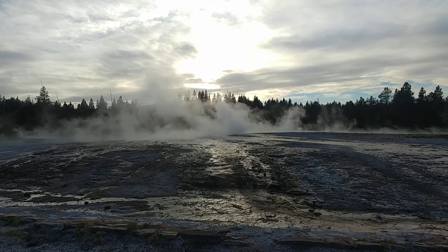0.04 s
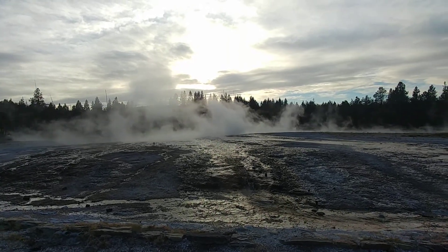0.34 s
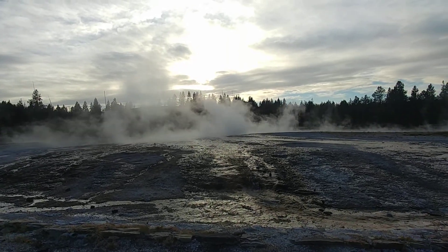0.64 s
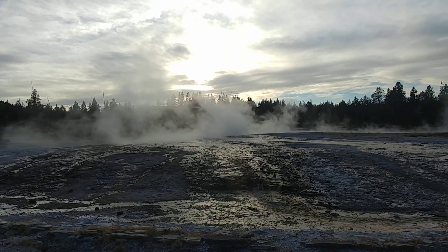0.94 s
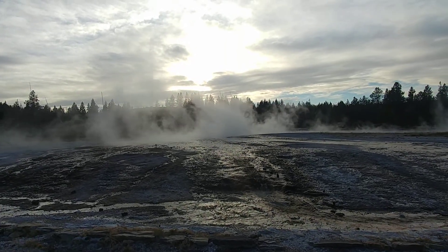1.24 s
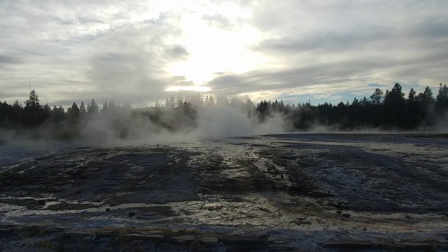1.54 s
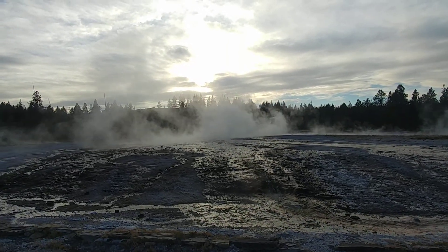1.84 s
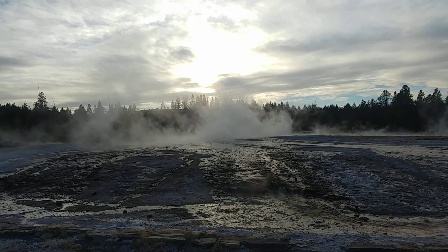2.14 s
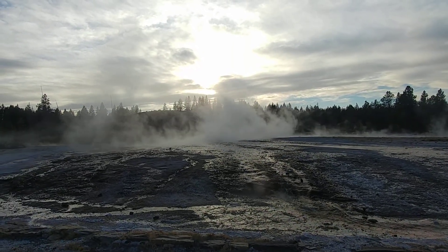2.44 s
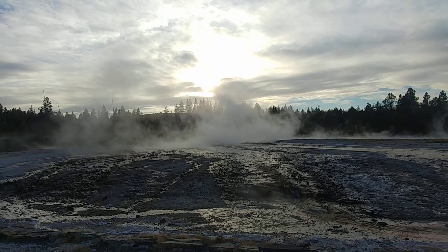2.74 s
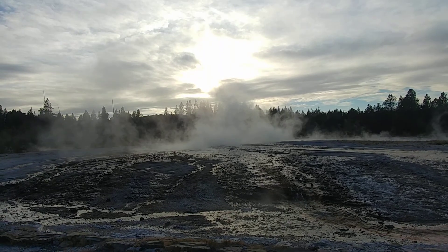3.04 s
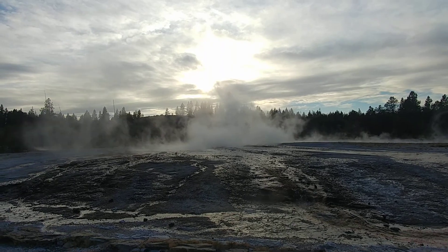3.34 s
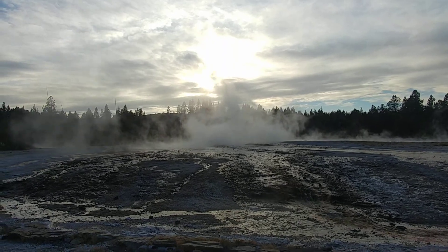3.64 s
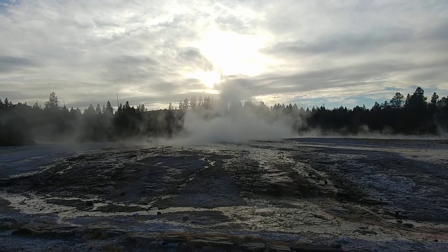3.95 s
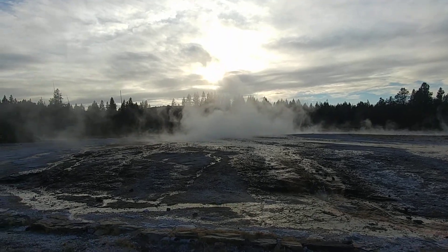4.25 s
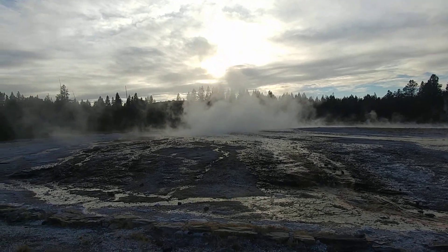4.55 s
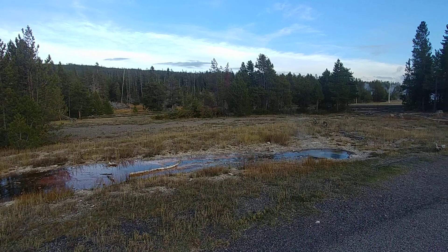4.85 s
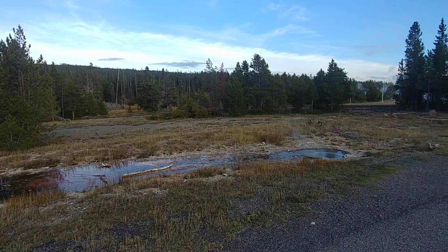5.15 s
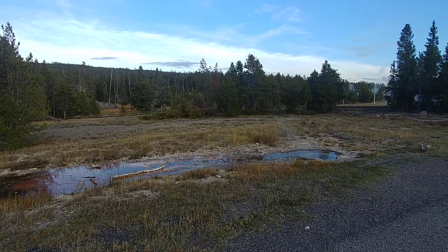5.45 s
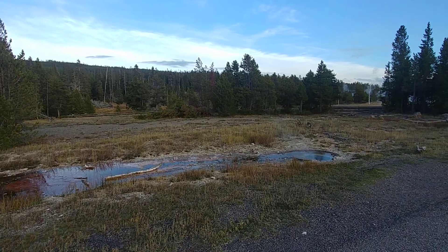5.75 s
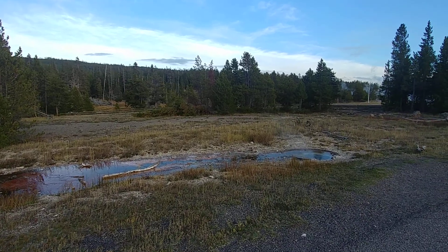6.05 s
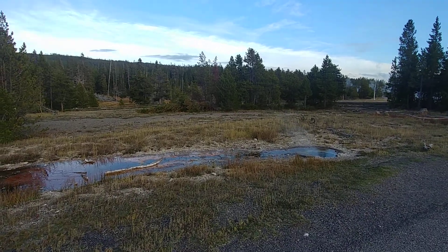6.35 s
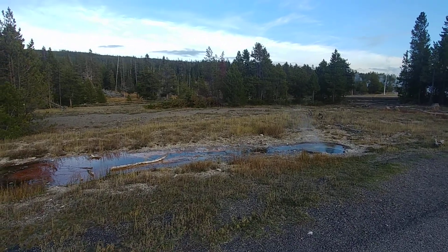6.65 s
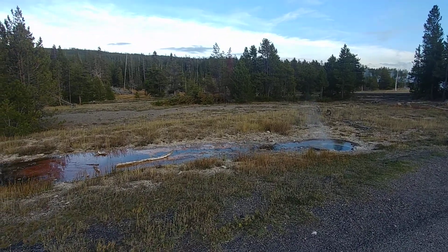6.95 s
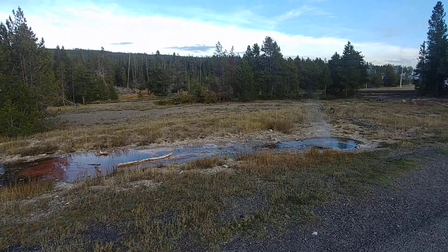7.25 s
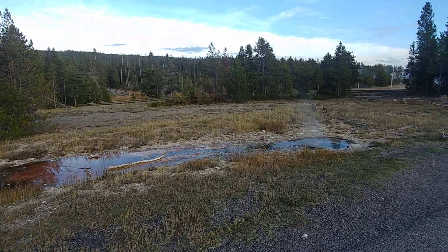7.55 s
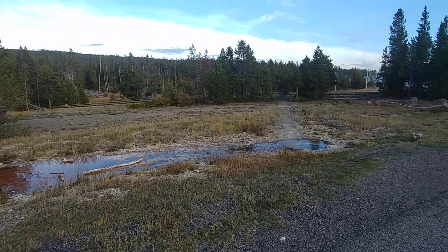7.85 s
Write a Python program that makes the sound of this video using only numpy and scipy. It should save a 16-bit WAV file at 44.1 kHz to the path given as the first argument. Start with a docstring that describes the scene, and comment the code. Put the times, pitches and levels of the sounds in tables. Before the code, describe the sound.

Low wind rumble and blunt thuds hit a stereo microphone while a small geyser splatters and hisses behind them, slightly to the left. The splashing thins toward steam, then stops abruptly as the place changes to a still meadow. There, distant trees and water murmur faintly, with tiny ticks, one brief swish and a light rustle. The wind comes and goes in separate gusts, the strongest thumping the left side.

```python
"""A small geyser splashes and hisses across a sinter flat: clumps of ringing drops, lifted by spurts,
with splatter giving way to steam. Wind eddies rumble and thud on the two ports of a slowly turning
microphone. The scene then cuts to a quiet meadow: a far murmur of trees and water, a few faint plips
and ticks, one short swish, and separate gusts, the hardest on the left port."""
import sys
import numpy as np
from scipy import signal
from scipy.fft import rfft, irfft, next_fast_len
from scipy.io import wavfile
from scipy.ndimage import uniform_filter1d, minimum_filter1d, map_coordinates

SR = 44100
rng = np.random.default_rng(int(sys.argv[2]) if len(sys.argv) > 2 else 0)


def pcm_store(signal):
    """Save signal as 16-bit PCM."""
    levels = np.round(np.clip(np.atleast_2d(signal), -1, 1) * 32767)
    wavfile.write(sys.argv[1], SR, levels.astype(np.int16).T)


N = 357651
TIME = np.arange(N) / SR
# bins and frames of the short-time spectra
HZ = np.fft.rfftfreq(512, 1 / SR)
FRAME_S = signal.stft(TIME, SR, nperseg=512, noverlap=384)[1]


def amp(db):
    """Decibels to gain."""
    return 10 ** (np.asarray(db) / 20)


def unit(x):
    """Scales to rms 1."""
    return x / np.sqrt(np.mean(x ** 2) + 1e-20)


def curve(rows, t, column=1):
    """An envelope: one column of a table of times, joined by straight lines."""
    rows = np.asarray(rows, float)
    return np.interp(t, rows[:, 0], rows[:, column])


def eq_curve(points, hz):
    """A table of frequencies, joined on a log axis."""
    f, value = np.transpose(points)
    return np.interp(np.log(hz + 1), np.log(f + 1), value)


def noise(colour, size=N):
    """Noise of rms 1 with a given spectrum."""
    n = next_fast_len(size)
    gain = amp(eq_curve(colour, np.fft.rfftfreq(n, 1 / SR)))
    return unit(irfft(rfft(rng.standard_normal(n)) * gain, n)[:size])


def wander(seconds):
    """A random modulator of rms 1 that drifts over the given time."""
    steps = np.arange(0, N / SR + 1, 1 / 1000)
    slow = signal.lfilter([1], [1, -np.exp(-1 / (1000 * seconds))], rng.standard_normal(len(steps)))
    return np.interp(TIME, steps, unit(slow))


def add(mix, s, sound):
    """Mixes a sound in at a given time."""
    part = mix[..., max(round(s * SR), 0):][..., :sound.shape[-1]]
    part += sound[..., :part.shape[-1]]


def spectra(x):
    """Short-time spectra, frames by bins."""
    return signal.stft(x, SR, nperseg=512, noverlap=384)[2].swapaxes(-1, -2)


def waveform(z):
    """Sound from short-time spectra."""
    return signal.istft(z.swapaxes(-1, -2), SR, nperseg=512, noverlap=384)[1][..., :N]


def burst(db, hz, decay_s, octaves, rise_s=.0005, size=4096):
    """A short spit of noise around one pitch that falls 20 dB in its decay time."""
    t, f = np.arange(size) / SR, np.fft.rfftfreq(size, 1 / SR)
    band = np.exp(-.5 * (np.log2((f + 1) / hz) / octaves) ** 2)
    strike = (1 - np.exp(-t / rise_s)) * 10 ** (-t / decay_s)
    spit = strike * irfft(rfft(rng.standard_normal(size)) * band)
    return amp(db) * spit * np.linalg.norm(strike) / np.linalg.norm(spit)


def murmur(level_db=-57, shared=0.26, lag_s=.0005):
    """Far trees and water: a wide bed of noise, only partly common to both ports."""
    # spectrum of the murmur: f/Hz, level/dB
    colour = [(60, 8.5), (200, 5), (380, -0.5), (650, 3), (1000, -6.5), (1500, -12.5), (2200, -15.5),
              (3200, -20.5), (5500, -24.5), (8000, -29), (10300, -31.5), (13000, -29), (15500, -25.5)]
    common = np.sqrt(shared) * noise(colour)
    ports = [np.roll(common, round(s * SR)) + np.sqrt(1 - shared) * noise(colour) for s in (0, lag_s)]
    return np.array(ports) * amp(level_db + 0.38 * wander(0.047))


def rustle(flutter_db=2.4):
    """A light, fluttering rustle that grows at the end."""
    # spectrum of the rustle: f/Hz, level/dB
    colour = [(500, -13), (1600, 5), (4500, 1), (8000, -5.5), (11000, -15), (16000, -11.5)]
    # its swell: t/s, level/dB
    swell = [(4.76, -79), (5.6, -79), (6.5, -85.5), (7.6, -77.5), (8.1, -71)]
    ports = np.array([noise(colour), noise(colour)])
    return ports * amp(curve(swell, TIME) + flutter_db * wander(.012))


def swish(at_s=7.17, level_db=-61.5, rise_db_per_s=320, fall_db_per_s=190):
    """One short, bright swish that fades more slowly than it rises."""
    # spectrum of the swish: f/Hz, level/dB
    colour = [(800, -16), (3000, -11.5), (4200, -2.5), (5900, -1), (8800, -8), (10500, -22), (16000, -24)]
    fade_db = np.maximum((at_s - TIME) * rise_db_per_s, (TIME - at_s) * fall_db_per_s)
    return np.array([noise(colour), amp(0.5) * noise(colour)]) * amp(level_db - fade_db)


def meadow(lean_db=2):
    """The quiet ambience, leaning a little to the left."""
    return (murmur() + rustle() + swish()) * amp([[lean_db], [-lean_db]])


def ticks():
    """Small ticks and plips close by, each with its own pan."""
    # ticks and plips: t/s, level/dB, f/Hz, decay/s, width/octaves, left minus right/dB
    hits = [(1.612, -59, 12000, 0.019, 0.44, -12), (4.829, -68, 900, .03, 0.25, 4),
            (4.940, -53.5, 895, 0.025, 0.1, 8), (5.227, -64, 2210, 0.019, 0.64, 5),
            (6.29, -70, 7000, .01, .8, 0), (6.383, -61.5, 1400, 0.019, .5, 3),
            (7.437, -71, 3200, .04, 0.39, 6), (7.52, -66, 1660, 0.028, 0.27, -2)]
    out = np.zeros((2, N))
    for s, db, hz, decay_s, octaves, pan_db in hits:
        add(out, s, burst(db, hz, decay_s, octaves) * amp([[pan_db / 2], [-pan_db / 2]]))
    return out


def eddies(breeze_db, doubling_db=46, low_cut_hz=58, steadiness=0.39, lump_db=2.5, gust_db=2.5):
    """Eddies sweep past one port: a harder gust carries them faster, so it is louder and brighter."""
    # spectrum of the eddies at speed 1: f/Hz, level/dB
    colour = [(20, -9), (75, 7.5), (120, -3.5), (160, -12.5), (220, -25), (300, -42), (420, -52.5),
              (800, -61), (3000, -93.5)]
    gusts = wander(0.03)
    gusts = unit(gusts - uniform_filter1d(gusts, size=13001))
    level_db = breeze_db + gust_db * np.minimum(gusts, 1.5) + lump_db * np.minimum(wander(0.015), 1.8)
    speed = 2 ** (np.maximum(level_db + 29.5, -5) / doubling_db)
    pressure = map_coordinates(noise(colour, size=2 * N), [np.cumsum(speed)], order=3, mode="wrap")
    pressure = signal.sosfilt(signal.butter(4, low_cut_hz, "highpass", fs=SR, output="sos"), pressure)
    # gentle compression: the gust, more than the single eddy, sets the level
    power = uniform_filter1d(abs(signal.hilbert(pressure, next_fast_len(N))[:N]) ** 2, size=1200)
    return amp(level_db) * unit(pressure / power ** (steadiness / 2))


def wind(trim_db=0.5):
    """The breeze rises twice at the geyser, then comes and goes in the meadow."""
    # strength of the breeze: t/s, left level/dB, right level/dB
    breeze = [(0.0, -35, -35), (0.65, -26, -25), (1.15, -27, -28), (1.7, -33.5, -31), (2.3, -33, -40),
              (2.8, -31, -27), (3.4, -31, -39), (4.25, -46, -42), (4.72, -36.5, -37), (4.9, -35, -59.5),
              (5.3, -29.5, -55), (5.6, -31.5, -39), (5.95, -35, -43.5), (6.24, -47.5, -56),
              (6.82, -46.5, -51), (7.3, -35, -37), (7.88, -47.5, -52.5), (8.11, -47, -44)]
    return amp(trim_db) * np.array([eddies(curve(breeze, TIME, column)) for column in (1, 2)])


def buffets(low_hz=60, rolloff=4.25, tilt=0.4, size=8192):
    """An eddy that strikes a port squarely gives a short, blunt thud."""
    # direct hits: t/s, level/dB, half length/s, top corner f/Hz, port (1 left, -1 right)
    hits = [(0.276, -21.5, 0.012, 96, -1), (0.411, -22.5, 0.018, 100, -1), (0.64, -17.5, 0.027, 121, -1),
            (0.691, -17.5, 0.013, 133, -1), (0.78, -18.5, 0.014, 115, -1), (0.917, -31, 0.015, 127, -1),
            (1.121, -15, 0.028, 132, -1), (1.18, -17.5, 0.011, 141, 1), (1.354, -24.5, 0.015, 246, -1),
            (1.519, -24.5, .016, 129, -1), (1.629, -28, 0.026, 109, 1), (1.875, -29.5, 0.024, 120, -1),
            (2.201, -23, 0.017, 95, 1), (2.72, -19.5, 0.016, 150, -1), (2.77, -16, 0.013, 107, 1),
            (3.145, -22.5, 0.016, 159, -1), (3.604, -23.5, 0.035, 169, -1), (3.73, -23.5, .012, 150, -1),
            (3.99, -30.5, 0.034, 99, 1), (4.834, -19, 0.013, 110, 1), (5.058, -22.5, 0.025, 130, 1),
            (5.115, -14, .02, 190, 1), (5.272, -12, 0.014, 122, 1), (5.311, -13, 0.0077, 183, 1),
            (5.349, -17.5, 0.011, 130, 1), (5.52, -21, 0.022, 101, 1), (5.82, -36, 0.015, 100, -1),
            (5.988, -20, 0.01, 156, 1), (6.027, -19, 0.034, 90, 1), (6.151, -24.5, 0.019, 82, 1),
            (6.464, -34, 0.014, 91, 1), (6.949, -3.5, 0.0094, 190, 1), (6.99, -8, 0.018, 254, 1),
            (7.034, -14.5, 0.017, 180, 1), (7.105, -23, 0.019, 134, 1), (7.249, -18.5, 0.02, 95, 1),
            (7.252, -29, 0.0059, 220, -1), (7.329, -26, 0.028, 123, -1), (7.575, -27, 0.019, 120, 1),
            (7.715, -20.5, 0.022, 129, -1)]
    t, f = (np.arange(size) - size / 2) / SR, np.fft.rfftfreq(size, 1 / SR)
    low_cut = f ** 4 / (f ** 4 + low_hz ** 4)
    out = np.zeros((2, N))
    for s, db, half_s, top_hz, port in hits:
        swell = np.exp(-(t / half_s) ** 2)
        colour = low_cut / (1 + (f / top_hz) ** rolloff) / (1 + f / low_hz) ** tilt
        thud = swell * irfft(rfft(rng.standard_normal(size)) * colour)
        add(out[int(port < 0)], s + t[0], amp(db) * thud * np.linalg.norm(swell) / np.linalg.norm(thud))
    return out


def droplets(surge, per_s=260, spread_db=2.5, cycles=1.28, wash_db=-1):
    """Drops of many sizes, each a few dying cycles, over a smooth wash; per_s counts at each pitch."""
    t, rain = np.arange(1024) / SR, np.zeros(N)
    pitches = np.geomspace(350, 13000, num=18)
    for hz, spread in zip(pitches, np.linspace(0.97, 1, len(pitches))):
        at, chance = rng.integers(0, N, size=4000), rng.random(size=(4000, 2))
        sizes = amp(spread * spread_db * np.minimum(-np.log(chance[:, 0]), 5))
        lands = chance[:, 1] < per_s * N / SR / len(at)
        clicks = np.bincount(at, sizes * lands * rng.choice([-1, 1], len(at)), N)
        drop = np.sin(2 * np.pi * hz * t) * np.exp(-hz * t / cycles) * (1 - np.exp(-2 * hz * t))
        rain += np.sqrt(hz) * unit(signal.oaconvolve(clicks, drop)[:N])
    return unit(unit(rain) * surge + amp(wash_db) * rng.standard_normal(N))


def splashes(trim_db=-2):
    """Larger splashes spit out above the drops, higher in pitch later on."""
    # single splashes: t/s, level/dB, f/Hz, decay/s
    hits = [(.081, -41.5, 2280, 0.022), (.421, -44.5, 2150, 0.026), (0.545, -38, 2200, 0.014),
            (.788, -44, 2370, 0.021), (1.245, -48, 2970, 0.067), (1.68, -38.5, 2860, 0.011),
            (1.822, -45, 2370, 0.028), (2.086, -48.5, 3000, 0.063), (2.833, -56, 6500, 0.049),
            (2.94, -47, 6040, 0.019), (3.048, -47, 5600, 0.0093), (3.41, -49.5, 6000, 0.013),
            (3.529, -48, 5730, 0.014), (3.562, -46.5, 4730, 0.012), (3.606, -44, 6460, 0.0075),
            (3.726, -50, 6040, 0.016), (3.783, -56, 5450, 0.022), (4.666, -50, 5300, 0.031)]
    out = np.zeros(N)
    for s, db, hz, decay_s in hits:
        add(out, s, burst(db + trim_db, hz, decay_s, octaves=0.34))
    return out


def spurts(t, rise_s=.06, fall_s=0.18):
    """The lift in dB from the spurts: each wells up quickly and falls back slowly."""
    # crests of the spurts: t/s, lift/dB
    crests = [(0.03, 2), (0.64, 5.5), (1.27, 3), (2.8, 5.5), (3.78, 2)]
    return sum(db * np.exp(-np.maximum((s - t) / rise_s, (t - s) / fall_s)) for s, db in crests)


def vent_eq(churn_db=-3.5, splatter_db=-2.0, spray_db=-2.0, fizz_db=-72, patch_db=1.5):
    """The vent's moving EQ, frames by bins: spurts lift the splatter most, then it gives way to steam."""
    # spectrum of the vent: f/Hz, level/dB
    vent_colour = [(150, 4.5), (380, -8), (620, 0.5), (880, -4.5), (1100, -1.5), (1500, -7), (2300, -4.5),
                   (2900, -9), (3900, -17), (5300, -18.5), (6100, -18), (8300, -25), (10300, -29),
                   (12000, -22.5), (15800, -20)]
    # play of the vent: t/s, churning water/dB, splatter/dB, steam and spray/dB
    play = [(0.0, -50.5, -49.5, -58), (0.45, -50.5, -53.5, -62), (1.55, -50, -52, -61),
            (2.4, -52, -57.5, -62.5), (3.1, -50.5, -56, -62.5), (3.65, -50, -58, -61.5),
            (4.1, -51, -58, -63.5), (4.75, -52, -59.5, -60)]
    colour, lift_db = amp(eq_curve(vent_colour, HZ)), spurts(FRAME_S)
    churn = curve(play, FRAME_S, 1) + 0.39 * lift_db + churn_db
    splatter = curve(play, FRAME_S, 2) + 0.86 * lift_db + splatter_db
    spray = curve(play, FRAME_S, 3) + 0.52 * lift_db + spray_db
    levels_db = np.array([churn, splatter, spray, np.full_like(spray, fizz_db)])
    bands_hz = [(450, 1400), (1600, 3600), (4500, 9000), (10500, 16000)]
    colour_db = [10 * np.log10(np.mean(colour ** 2 * (HZ > lo) * (HZ < hi))) for lo, hi in bands_hz]
    # each band rules its own range and crossfades into the next
    weights = [eq_curve(np.c_[np.ravel(bands_hz), np.repeat(own, 2)], HZ) for own in np.eye(4)]
    gain_db = (levels_db.T - colour_db) @ np.array(weights)
    # random patches in time and pitch make the tone flicker
    patches = uniform_filter1d(rng.standard_normal(gain_db.shape), size=14, axis=0)
    patches = unit(uniform_filter1d(patches, size=10, axis=1))
    return colour * amp(gain_db + patch_db * patches)


def geyser(clump_db=1.7):
    """Water falls back in clumps; as the microphone turns, the left port hears it ever later."""
    # the vent's bearing: t/s, lag of the left port/ms
    bearing = [(0, 0.05), (0.6, 0.067), (1.85, 0.094), (2.85, 0.14), (4.75, 0.22)]
    # its pan by frequency: f/Hz, left minus right/dB
    balance = [(200, 2.5), (650, 6), (1200, 4), (1700, -3.5), (2600, 2), (4400, 4), (6000, 7), (8000, 8),
               (10500, -5.5), (15000, 1.5)]
    # likeness of the two ports: f/Hz, coherence (0-1)
    coherence = [(300, 1), (2500, 0.62), (4000, 0.57), (6000, 0.85), (8500, 0.54), (14000, 0.3)]
    surge = amp(clump_db * np.minimum(wander(0.0096), 2))
    eq, splash = vent_eq(), spectra(splashes())
    # the part common to both ports comes straight from the vent, the rest is scattered
    likeness = eq_curve(coherence, HZ)
    direct = spectra(droplets(surge)) * eq * np.sqrt((1 + likeness) / 2) + splash
    scattered = spectra(droplets(surge)) * eq * np.sqrt((1 - likeness) / 2)
    # the vent lies off to one side; the finest fizz comes from the wet ground ahead
    aside = eq_curve([(8400, 1.0), (9200, 0.18)], HZ)
    lag = np.exp(-2j * np.pi * np.outer(curve(bearing, FRAME_S), HZ * aside) / 1000)
    lean = amp(eq_curve(balance, HZ) / 2)
    return waveform(np.array([(direct + scattered) * lag * lean, (direct - scattered) / lean]))


def scene(cut_s=4.758):
    """The geyser until the cut, then the meadow; wind throughout."""
    place = np.where(TIME < cut_s, geyser(), meadow())
    return place + ticks() + buffets() + wind()


def record(dry, low_cut_hz=47, ceiling=.96, high_cut_hz=15850):
    """The microphone sheds the deepest rumble, a limiter holds the hardest gust; then a steep high cut."""
    thinned = signal.sosfilt(signal.butter(4, low_cut_hz, "highpass", fs=SR, output="sos"), dry)
    allowed = np.minimum(1, ceiling / (abs(thinned) + 1e-9))
    held = minimum_filter1d(allowed, size=601)
    gain = uniform_filter1d(uniform_filter1d(held, size=301), size=301)
    high_cut = signal.firwin(511, high_cut_hz, window=("kaiser", 9), fs=SR)
    return signal.oaconvolve(thinned * gain, high_cut[None], "same")


dry = scene()
out = record(dry)
pcm_store(out)
```